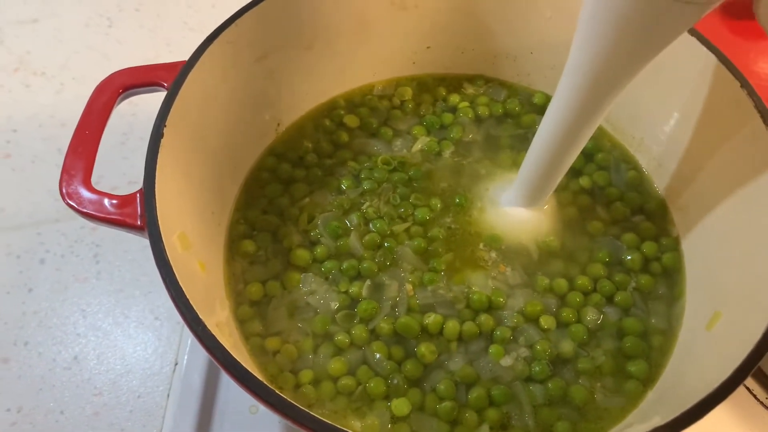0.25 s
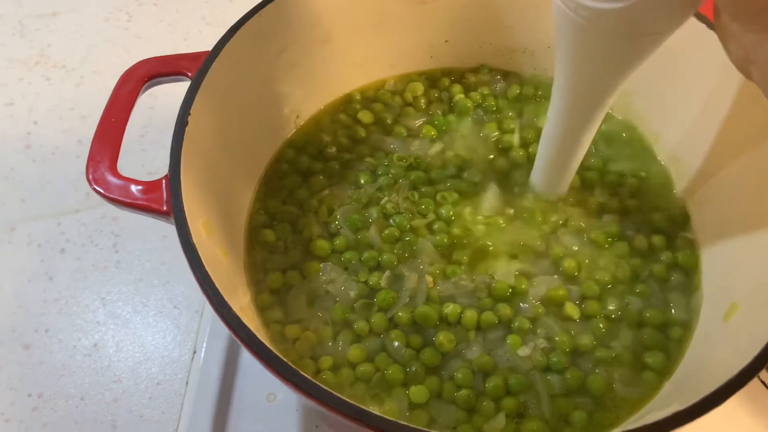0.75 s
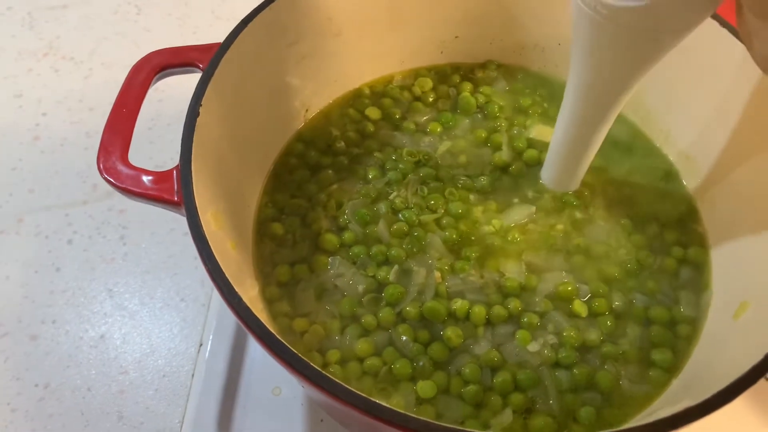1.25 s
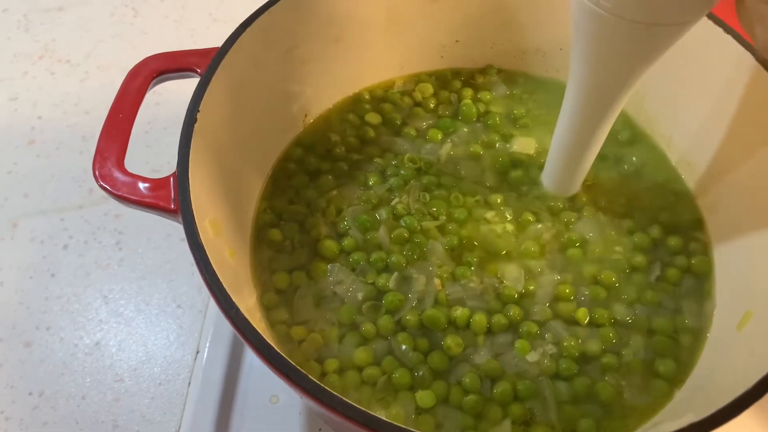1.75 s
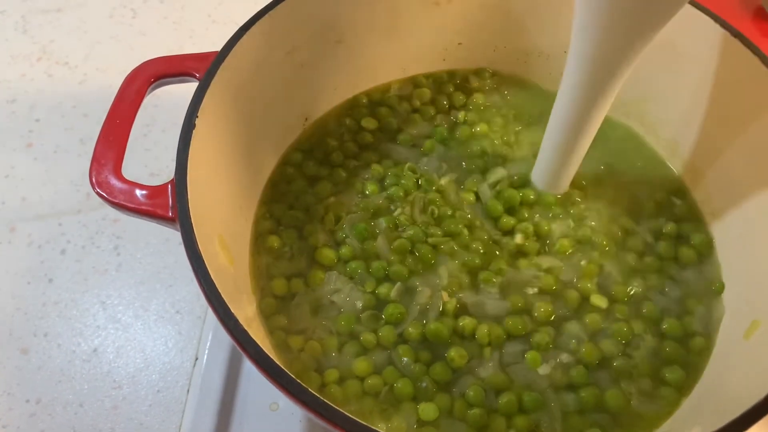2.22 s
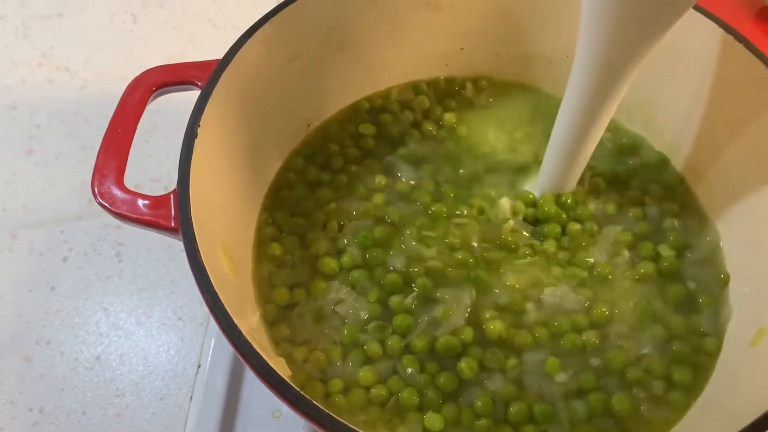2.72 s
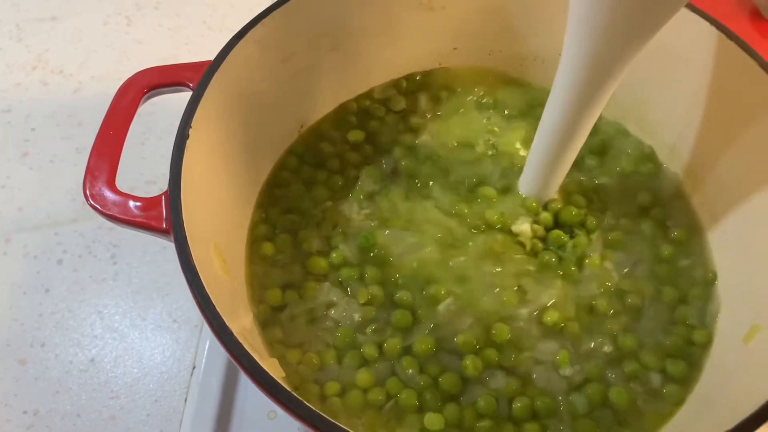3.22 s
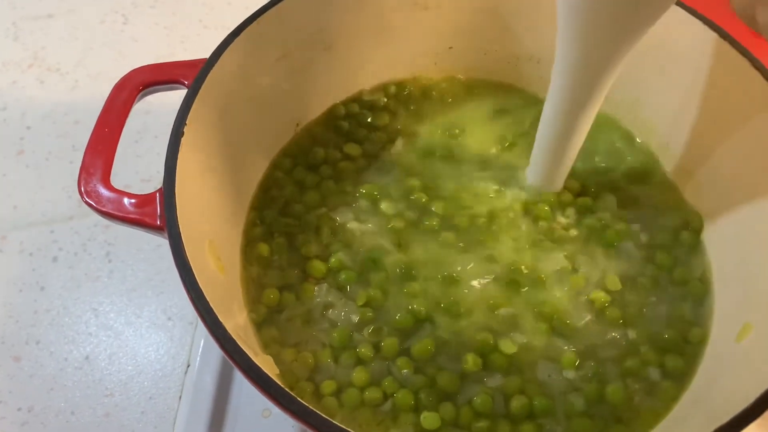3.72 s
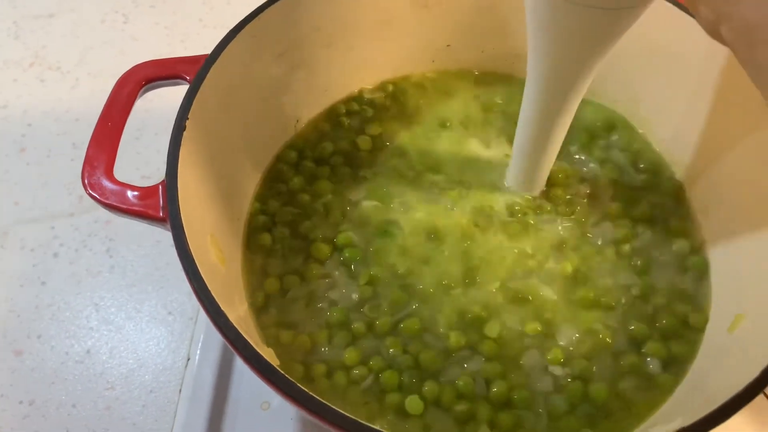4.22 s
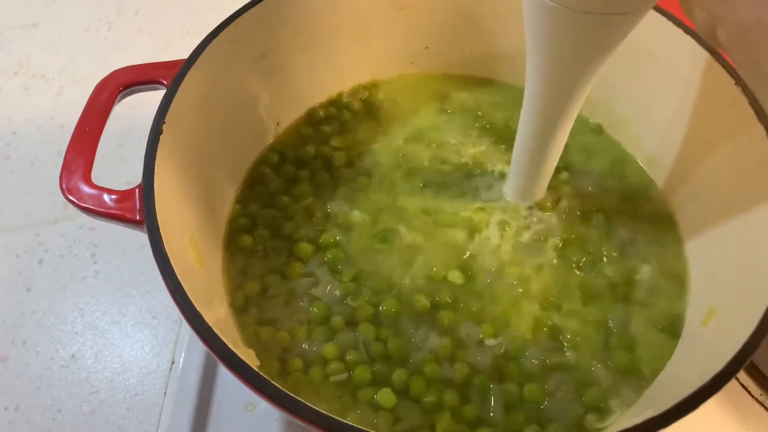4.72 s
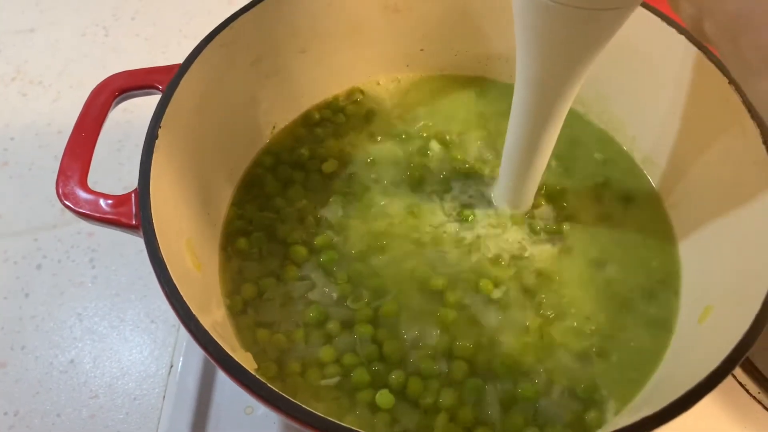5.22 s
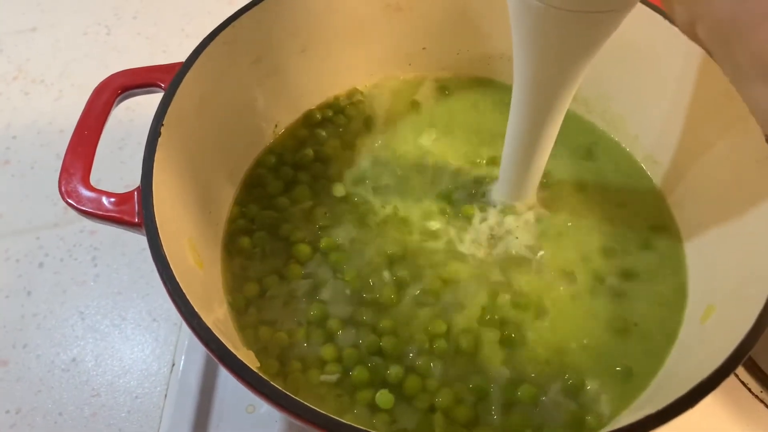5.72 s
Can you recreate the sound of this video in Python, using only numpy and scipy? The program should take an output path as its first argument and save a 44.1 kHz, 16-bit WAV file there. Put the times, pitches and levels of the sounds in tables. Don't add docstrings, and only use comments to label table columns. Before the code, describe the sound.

Switch snaps, then an immersion blender buzzes through watery peas three times, churning, sloshing and hissing, each release sinking into faint swirling fizz.

```python
import sys
import numpy as np
from scipy import signal
from scipy.fft import rfft, irfft, next_fast_len
from scipy.io import wavfile
from scipy.ndimage import uniform_filter1d, map_coordinates

SR = 44100
rng = np.random.default_rng(int(sys.argv[2]) if len(sys.argv) > 2 else 0)


def pcm_store(signal):
    levels = np.round(np.clip(np.atleast_2d(signal), -1, 1) * 32767)
    wavfile.write(sys.argv[1], SR, levels.astype(np.int16).T)


def elevation(decibels):
    levels = np.asarray(decibels, float)
    return 10 ** (levels / 20)


N = 263012

# (frequency [Hz], level [dB])
RUMBLE_COLOUR = [(15, -45.5), (28, -20.5), (40, 0.5), (62, 4.5), (80, -8), (100, -4.5), (125, -12),
                 (170, -39.5)]
# (time [s], level [dB])
HAND_GRIP = [(.1, 3), (.2, 11), (.55, 3), (.7, 1)]
# (time [s], level [dB])
SUPPRESSION = [(0, 2.5), (.11, 2.5), (.85, 4), (1, -9.5), (1.1, -10.5), (1.14, -30), (1.2, -20.5),
               (1.23, -6.5), (3.05, 0), (3.15, -15), (3.22, 0)]
# (frequency [Hz], level [dB])
AIR_COLOUR = [(120, -38.5), (200, 12.5), (350, 8), (700, -12), (1100, -13), (2200, 1.5), (3500, -11.5),
              (6000, -35.5)]

# (time [s], peak level [dB], thud level [dB])
SWITCH_KNOCKS = [
    (0.121, -24, -11),
    (0.127, -6.5, -2),
    (1.177, -58, 29.5),
    (1.206, -26, -15),
    (1.217, -17, 12.5),
    (1.264, -25, 10),
    (3.2, -38, -14),
    (3.216, -36, 14),
]
# (on [s], off [s], blade rate missing at start [Hz], swirl drain after release [dB/s],
# tone fade after release [dB/s])
PRESSES = [
    (.124, 0.606, 301.3, 125, 220),
    (1.205, 2.9, 331.4, 104.8, 260),
    (3.205, 5.777, 200.7, 68.5, 119.1),
]
# (time [s], rate [Hz])
BLADE_SPEED = [
    [(.24, 488.8), (.38, 488), (.43, 509.5), (.5, 519.1), (.605, 534.5)],
    [(1.44, 551), (1.504, 549), (1.6, 565.5), (1.864, 564.4), (1.974, 575.7), (2.176, 565.6),
     (2.426, 551.2), (2.7, 545.3), (2.9, 542)],
    [(3.45, 510.5), (3.73, 524.5), (3.8, 537), (3.85, 552), (3.94, 563.4), (4.62, 583.9), (5.05, 594.4),
     (5.5, 588.2), (5.76, 596)],
]

# (time [s], churning level [dB], splashing level [dB])
SOUP_LEVELS = [
    [(.135, -31, -31.5), (.167, -24, -29), (.195, -21.5, -21.5), (.28, -28, -27), (.365, -30.5, -23),
     (.51, -27, -30.5), (.59, -32.5, -28), (.63, -27, -29.5)],
    [(1.217, -48, -47), (1.279, -20, -32), (1.31, -26, -27.5), (1.371, -27.5, -25.5), (1.455, -29, -28.5),
     (1.523, -35.5, -33.5), (1.64, -32.5, -33.5), (1.8, -36, -38), (2.92, -38, -38.5)],
    [(3.21, -48, -62), (3.26, -35.5, -43), (3.34, -34.5, -38), (3.6, -35, -37), (3.74, -35.5, -36.5),
     (3.9, -36, -43.5), (5.05, -38.5, -44), (5.22, -39, -42), (5.4, -38, -43)],
]
# (time [s], length [s], level [dB])
GUARD_CHATTER = [(.34, 0.066, -41), (0.464, 0.04, -25), (0.552, 0.034, -31), (1.327, .16, -32.5),
                 (1.371, 0.016, -24.5), (2.17, .02, -27), (2.183, .72, -31.5), (3.426, 0.031, -27.5),
                 (3.515, .02, -26.5), (3.541, .1, -35), (5.177, 0.064, -35)]
# (frequency [Hz], width [Hz], level [dB])
BASE_MODES = [(149.8, 12.2, -0.5), (186.7, 13, 0.5), (284.3, 16.7, 8.5)]
# (frequency [Hz], width [Hz], level [dB])
POT_MODES = [(661, 30.4, -2.5), (783, 46, -11.5), (1124, 104, -1), (1369, 39, -0.5), (1440, 78, -8),
             (2060, 18, -29)]
# (frequency [Hz], level [dB])
ROAR_COLOUR = [(250, -16.5), (420, -14.5), (600, -2.5), (800, 2), (1100, -0.5), (1500, -3.5), (1900, -11.5),
               (2500, -18), (4000, -17)]
SLOSH_COLOUR = [(900, -28.5), (1600, 6), (2200, -0.5), (3000, -3), (4200, -7), (5200, -17), (7500, -32)]
HISS_COLOUR = [(3000, -51), (4500, -5.5), (6000, -1), (7500, 3), (9000, -4), (12000, -7.5), (15500, -9),
               (17000, -11)]
# (frequency [Hz], width [Hz], level [dB])
RATTLE_MODES = [(10630, 2600, 0)]
# (time [s], level [dB])
GUARD_PRESS = [
    [(.145, -39), (.2, -32.5), (.6, -46.5)],
    [(1.27, -52), (1.39, -47.5), (2.05, -44), (2.6, -39.5), (2.9, -35.5)],
    [(3.22, -55), (3.3, -37), (3.48, -40.5), (5.0, -37.5), (5.71, -36)],
]
# (frequency [Hz], width [Hz], level [dB])
BELLY_MODES = [(415, 22, -2), (448, 18.2, 0.5), (541, 41, 1.5), (298, 62, -12.5), (156.7, 9.6, -12.5)]
# (time [s], peak level [dB])
PEA_CHOPS = [(0.171, -25), (0.2094, -23), (0.2443, -20), (0.2803, -21), (0.4886, -4), (1.3014, -19),
             (1.3619, -16), (2.1886, -21), (2.2463, -16), (2.5272, -23), (3.2, -30), (3.277, -27),
             (3.4077, -25), (5.2523, -13), (5.4031, -16)]

# (time [s], blade tone level [dB], octave level [dB], higher orders level [dB])
BLADE_SONG = [
    [(.18, -49, -51.5, -50.5), (.24, -32, -53, -40), (.3, -37, -28, -41), (.43, -28.5, -30, -30),
     (.5, -21.5, -22.5, -26), (.556, -18.5, -44, -26.5), (.605, -14.5, -29, -20.5)],
    [(1.24, -26.5, -36, -14), (1.284, -30.5, -17.5, -22), (1.42, -16, -17, -36), (1.51, -28, -19.5, -29),
     (1.67, -23, -25.5, -26.5), (1.73, -24.5, -15, -30), (2.05, -24.5, -22, -34),
     (2.5, -14.5, -23.5, -37.5), (2.9, -18, -23.5, -37)],
    [(3.3, -32, -44, -47), (3.45, -28, -31, -28), (3.66, -12.5, -47, -32.5), (3.8, -12.5, -27, -30),
     (3.87, -21, -21.5, -34), (4.1, -25, -31.5, -48), (4.7, -24, -26.5, -38), (5.3, -20.5, -25.5, -41.5),
     (5.76, -25.5, -26.5, -38.5)],
]
# (time [s], half length [s], blade tone change [dB], octave change [dB])
BLADE_GULPS = [(0.435, 0.029, -1.5, 13.5), (0.59, 0.01, 0, 19), (2.205, 0.013, -47, 4),
               (2.26, 0.0087, -15, -2), (2.336, 0.0069, -13, 3), (2.505, .025, -4.5, -9),
               (2.614, 0.014, -11, 2), (2.706, 0.021, -16, -3.5), (3.364, 0.034, -3.5, 16.5),
               (1.764, 0.033, 1.5, 3.5), (2.226, 0.008, 5, 3), (4.019, 0.012, -19, -3),
               (3.54, 0.029, -1.5, -6), (4.101, 0.031, -6.5, 5.5), (4.356, 0.047, -23, -3),
               (4.5, 0.058, -25, 1.5), (4.593, 0.032, -4.5, -19), (5.073, 0.057, -14, -1.5),
               (5.26, 0.033, 0.5, 7), (5.427, 0.038, -8.5, 3.5), (5.56, 0.033, 1, -9),
               (5.813, 0.027, 4.5, 19), (5.856, .02, 19, 0.5)]
# (multiple of blade rate [-], level [dB])
HIGH_ORDERS = [(1.5, -17.5), (2.5, -4.5), (3.5, -18.5), (4, -6), (5, -13), (6, -16), (7, -17)]

# (frequency [Hz], phase [radians])
PORT_LEAD = [(80, .18), (260, 0.54), (550, 1.99), (800, 2.1), (1300, 1.86), (2300, 2.02), (3000, 2.92),
             (3800, 3.9), (4500, 3.5)]
# (frequency [Hz], level difference [dB])
PORT_LEAN = [(100, -4), (500, 0.9), (780, -8), (1100, -3.5), (1400, -2), (2200, -4.5), (3300, 0)]
# (frequency [Hz], decay time [s])
KITCHEN_DECAY = [(200, 0.34), (2000, 0.16), (10000, 0.18)]
# (low edge [Hz], high edge [Hz])
SUM_HOLES = [(4330, 5130), (8350, 9450), (12450, 13780), (15700, 30000)]
DIFFERENCE_HOLES = [(6300, 7550), (10400, 11700), (14450, 30000)]

BITE_S = 0.0093
SPIN_UP_S, COAST_S = .065, .26
BOG_S, BOG_HZ, BOG_IN_S, BOG_OUT_S = 5.26, 22.69, 0.0634, .09
SOUP_LAG_S = 0.024
SWIRL_DB, SWIRL_FADES_DB_S = -44, 41
SPLASH_STOPS_DB_S, HISS_STOPS_DB_S = 263, 198
FOAM_DB, FOAM_FADES_DB_S, FOAM_BRIGHT_DB = -49.5, 24, 3
HISS_DB, HISS_WITH_RATTLE = -3.5, .15
CHATTER_IDLE_DB, CHATTER_RISE_DB_S, CHATTER_FALL_DB_S = -13.5, 303, 204
BELLY_FADES_DB_S = 61.5
SHAFT_DB, SHAFT_PEAK_HZ, SHAFT_WIDTH_HZ = 2.5, 292, 22.5
SPIN_UP_BLUR_DB = -9
LET_GO_DB, LET_GO_S = -8, 0.008
PORT_DELAY_S = 2.325e-4
MIC_LOW_HZ = 60
THIN_HZ = 13700


def unit(x):
    return x / np.sqrt(np.mean(x ** 2) + 1e-20)


def along(points, hz):
    f, v = np.transpose(points)
    return np.interp(np.log(hz + 1), np.log(f + 1), v)


def curves(rows):
    s, *columns = np.transpose(rows)
    return [np.interp(np.arange(N) / SR, s, column) for column in columns]


def wobble(rate):
    coarse = np.arange(0, N + 64, 64)
    knots = rng.standard_normal(int(N * rate / SR) + 4)
    return np.interp(np.arange(N), coarse, map_coordinates(knots, [coarse * rate / SR]))


def filtered(x, response):
    m = next_fast_len(N + SR // 2)
    return irfft(rfft(x, m) * response(np.fft.rfftfreq(m, 1 / SR)), m)[..., :N]


def modes(table, f):
    total = 0
    for k, (centre, width, db) in enumerate(table):
        ring = 1j * f * width / (centre * centre - f * f + 1j * f * width)
        total = total + (-1) ** k * elevation(db) * ring
    return total


def patchy(patchy_db):
    z = signal.stft(rng.standard_normal(N + SR), nperseg=512)[2]
    field = uniform_filter1d(uniform_filter1d(rng.standard_normal(z.shape), 6, 0), 8, 1)
    return signal.istft(z * elevation(patchy_db * unit(field)), nperseg=512)[1][:N]


def bursts():
    on, off = np.transpose(PRESSES)[:2]
    t = np.arange(N) / SR
    k = np.maximum(np.searchsorted(on, t) - 1, 0)
    return k, t - on[k], np.maximum(t - off[k], 0)


def per_burst(tables):
    return np.choose(bursts()[0], [np.array(curves(rows)) for rows in tables])


def bite_db():
    since_on = bursts()[1]
    return np.where(since_on < 0, -100, 20 * np.clip(since_on / BITE_S - 1, -1, 0))


def rumble():
    low = filtered(rng.standard_normal(N), lambda f: elevation(along(RUMBLE_COLOUR, f)))
    level_db = -61 + 1.1 * wobble(3.088) + curves(HAND_GRIP)[0] + .45 * curves(SUPPRESSION)[0]
    return elevation(level_db) * unit(low)


def air():
    tone = filtered(patchy(patchy_db=1.5), lambda f: elevation(along(AIR_COLOUR, f)))
    return elevation(-56.5 + curves(SUPPRESSION)[0]) * unit(tone)


def switch_clicks():
    out, t = np.zeros(N + SR), np.arange(SR // 20) / SR
    for s, db, thud_db in SWITCH_KNOCKS:
        grit = uniform_filter1d(rng.standard_normal(len(t)), size=2)
        crack = (1 - np.exp(-t / 0.00047)) * elevation(-60 * t / 0.029) * grit
        thud = elevation(thud_db - 13 - 60 * t / .04) * np.sin(2 * np.pi * 1020 * t)
        out[round(s * SR):][:len(t)] += elevation(db - 5.5) * (crack + thud)
    return out[:N]


def blade_hz():
    k, since_on, since_off = bursts()
    late = np.arange(N) / SR - BOG_S
    bog = BOG_HZ * np.exp(-(late / np.where(late < 0, BOG_IN_S, BOG_OUT_S)) ** 2)
    missing = np.array(PRESSES)[k, 2] * np.exp(-np.maximum(since_on, 0) / SPIN_UP_S)
    return (per_burst(BLADE_SPEED)[0] - missing - bog) * np.exp(-since_off / COAST_S)


def shaft():
    return np.cumsum(blade_hz() * (1 + 0.0019 * wobble(40))) / SR


def soup_db():
    k, _, since_off = bursts()
    after, t = np.maximum(since_off - SOUP_LAG_S, 0), np.arange(N) / SR
    churn_db, splash_db = per_burst(SOUP_LEVELS) + bite_db()
    shut_db = .6 * curves(SUPPRESSION)[0]
    foam_db = np.minimum(splash_db, FOAM_DB - FOAM_FADES_DB_S * after) + shut_db
    splash_db = np.maximum(splash_db - SPLASH_STOPS_DB_S * after, foam_db)

    chatters = []
    for s, length, db in GUARD_CHATTER:
        rise_db = CHATTER_RISE_DB_S * np.maximum(s - t, 0)
        fall_db = CHATTER_FALL_DB_S * np.maximum(t - s - length, 0)
        chatters.append(db - rise_db - fall_db)
    chatter_db = np.max(chatters, axis=0)
    over_db = np.maximum(chatter_db - splash_db - CHATTER_IDLE_DB, 0) * (bite_db() > -1)

    swirl_db = np.minimum(churn_db, SWIRL_DB - SWIRL_FADES_DB_S * after) + shut_db
    roar_db = np.maximum(churn_db - np.array(PRESSES)[k, 3] * after + 0.22 * shut_db, swirl_db)
    spray_db = splash_db - HISS_STOPS_DB_S * after
    hiss_db = np.maximum(spray_db, foam_db + FOAM_BRIGHT_DB * (after > 0))
    hiss_db = hiss_db + HISS_DB + HISS_WITH_RATTLE * over_db
    rattle_db = np.maximum(spray_db, foam_db) + CHATTER_IDLE_DB + over_db
    return roar_db, splash_db, hiss_db, rattle_db


def churn(turns):
    roar_db, slosh_db, hiss_db, rattle_db = soup_db()

    def beat(depth):
        return 1 + depth * np.cos(2 * np.pi * turns) + 0.3 * depth * np.cos(np.pi * turns)

    surge = 1.0 * wobble(17) + 0.98 * wobble(45)
    spatter = elevation(6.0 * rng.standard_normal(N)) * (rng.random(N) < .03) * rng.standard_normal(N)
    spatter = unit(spatter)
    tick = 0.47 + elevation(5.5 * wobble(150)) * np.cos(np.pi * turns / 2) ** 6

    base = filtered(patchy(patchy_db=1.0), lambda f: modes(BASE_MODES, f) / (1 + (f / 330) ** 4))
    roar = filtered(patchy(patchy_db=2.5) * beat(0.35),
                    lambda f: elevation(along(ROAR_COLOUR, f)) * (0.2 + np.abs(modes(POT_MODES, f))))
    slosh = filtered(patchy(patchy_db=1.5) * beat(0.25), lambda f: elevation(along(SLOSH_COLOUR, f)))
    hiss = filtered(patchy(patchy_db=0.5) * beat(0.4) + 0.35 * spatter,
                    lambda f: elevation(along(HISS_COLOUR, f)))
    rattle = filtered(patchy(patchy_db=-5.5) * tick + 0.39 * spatter,
                      lambda f: modes(RATTLE_MODES, f) ** 2)

    mix = elevation(0.49 * roar_db - 28.5) * unit(base)
    mix += elevation(roar_db + 7 + 0.44 * surge) * unit(roar)
    mix += elevation(slosh_db + 6 + 0.21 * surge) * unit(slosh)
    mix += elevation(hiss_db + 3.5 + 0.98 * surge) * unit(hiss)
    mix += elevation(rattle_db - 7 + 0.4 * surge) * unit(rattle)
    return mix


def belly():
    shake_db = per_burst(GUARD_PRESS)[0] + bite_db() - BELLY_FADES_DB_S * bursts()[2]
    ring = filtered(patchy(patchy_db=1.5), lambda f: np.abs(modes(BELLY_MODES, f)) / (1 + (f / 600) ** 4))
    return elevation(shake_db + 5 + 1.0 * wobble(11)) * unit(ring)


def struck_peas():
    out, t = np.zeros(N + SR), np.arange(SR // 20) / SR
    for s, db in PEA_CHOPS:
        bright = np.diff(rng.standard_normal(len(t) + 1))
        out[round(s * SR):][:len(t)] += elevation(db - 13.5 - 60 * t / 0.032) * bright
    return out[:N]


def whine(turns):
    k, since_on, since_off = bursts()

    def tone(order, waver):
        phase = 2 * np.pi * (order * turns + rng.random()) + waver * wobble(30)
        return (1 + waver * wobble(30)) * np.sin(phase)

    first_db, second_db, third_db = per_burst(BLADE_SONG)
    for s, half, first_change_db, second_change_db in BLADE_GULPS:
        gulp = np.exp(-((np.arange(N) / SR - s) / half) ** 2)
        first_db = first_db + first_change_db * gulp
        second_db = second_db + second_change_db * gulp
    off_peak = (blade_hz() - 2 * SHAFT_PEAK_HZ) / SHAFT_WIDTH_HZ
    shaft_db = SHAFT_DB + per_burst(GUARD_PRESS)[0] - 10 * np.log10(1 + off_peak ** 2) + 2 * wobble(14)

    high = sum(elevation(db + 2.4 * wobble(8)) * tone(order, waver=0.37) for order, db in HIGH_ORDERS)
    high = high * elevation(SPIN_UP_BLUR_DB * np.exp(-np.abs(since_on) / .15))
    tones = elevation(first_db + 3) * tone(order=1, waver=0.2)
    tones += elevation(second_db + 1.0) * tone(order=2, waver=0.25)
    tones += elevation(third_db + 1.5 + 0.95 * wobble(9)) * (tone(order=3, waver=0.39) + high)
    tones += elevation(shaft_db + 3.5) * tone(order=.5, waver=0.32)

    start_db = bite_db() - 87 * np.exp(-np.abs(since_on) / 0.02)
    let_go_db = LET_GO_DB * (1 - np.exp(-since_off / LET_GO_S))
    fade_db = np.array(PRESSES)[k, 4] * since_off
    return elevation(start_db + let_go_db - fade_db) * tones


def kitchen(x):
    hz, t, z = signal.stft(rng.standard_normal((2, SR // 2)), SR, nperseg=256)
    decay = elevation(-60 * t / along(KITCHEN_DECAY, hz)[:, None])
    tail = signal.istft(z * decay * (hz[:, None] > 400), SR, nperseg=256)[1]
    return signal.fftconvolve(x[None], tail / np.linalg.norm(tail[0]), axes=1)[:, :N]


def ports(x):
    def response(f):
        low_cut = f * f / (f * f + MIC_LOW_HZ ** 2)
        turn = np.pi * f * PORT_DELAY_S - along(PORT_LEAD, f) / 2
        half = elevation(along(PORT_LEAN, f) / 2) * np.exp(1j * turn)
        return low_cut * np.array([half, 1 / half])

    return filtered(x, response)


def without(x, gaps):
    hz, t, z = signal.stft(x, SR, nperseg=2048)
    hz = hz[:, None]
    keep = rng.random(z.shape) > .3 * (hz > THIN_HZ)
    lost = np.repeat(rng.random((len(hz) // 16 + 1, len(t))) < .1, 16, axis=0)[:len(hz)]
    keep &= ~lost | (hz < THIN_HZ)
    for low, high in gaps:
        slip = 260 * (rng.random((2, len(t))) < .1) + 40 * rng.standard_normal((2, len(t)))
        keep &= (hz < low + slip[0]) | (hz > high - slip[1])
    treble = np.sum(np.abs(z[hz[:, 0] > 5000]) ** 2, axis=0)
    attack = treble > 300 * np.roll(treble, 2)
    attack[:2] = False
    keep |= attack & (hz < 15900)
    return signal.istft(z * keep, SR, nperseg=2048)[1][:N]


def scene():
    turns = shaft()
    noise = air() + switch_clicks() + churn(turns) + belly() + struck_peas()
    return ports(whine(turns) + noise) + elevation(-11.0) * kitchen(noise) + rumble()


def top_cut(x):
    return signal.sosfilt(signal.butter(12, 17020, fs=SR, output="sos"), x)


def record(dry):
    soft = dry / (1 + np.abs(dry / .9) ** 6) ** (1 / 6)
    mid = without((soft[0] + soft[1]) / 2, SUM_HOLES)
    side = without((soft[0] - soft[1]) / 2, DIFFERENCE_HOLES)
    mix = np.array([mid + side, mid - side])
    return top_cut(mix)


dry = scene()
out = record(dry)
pcm_store(out)
```